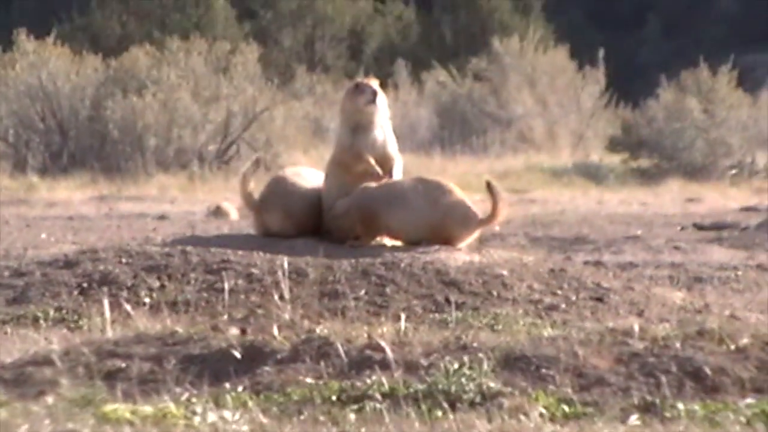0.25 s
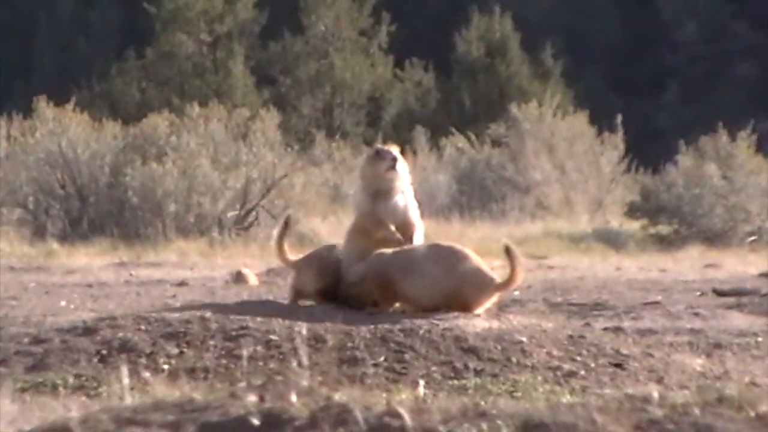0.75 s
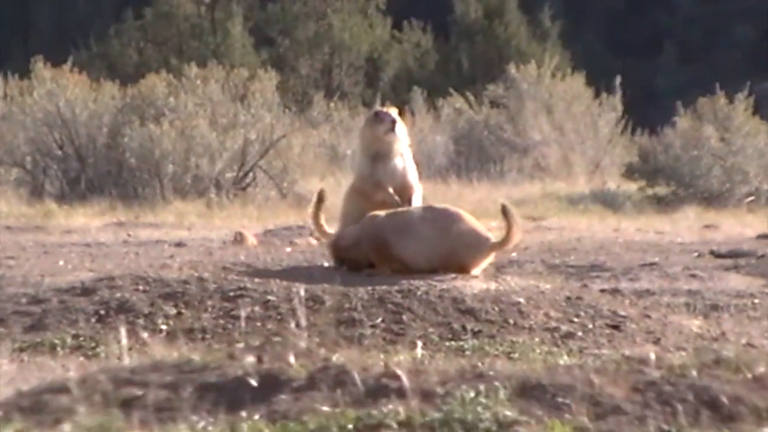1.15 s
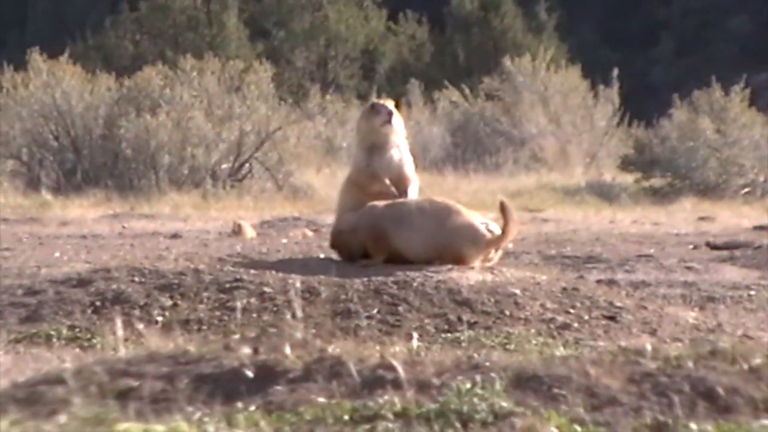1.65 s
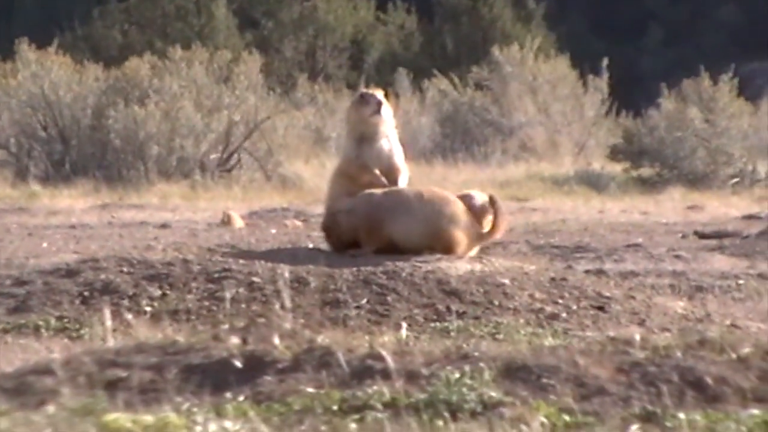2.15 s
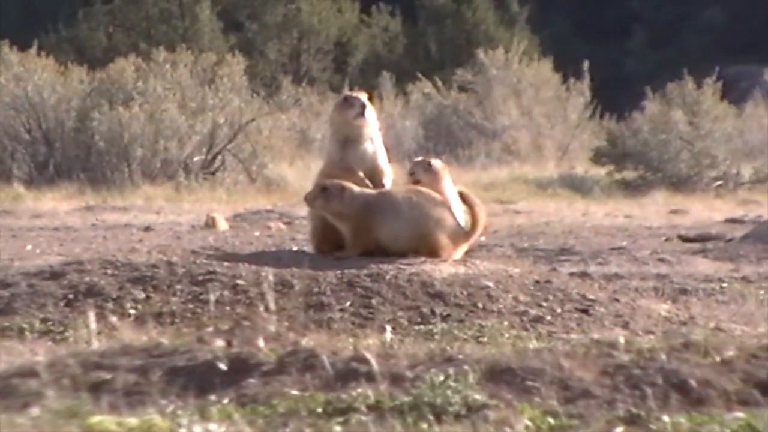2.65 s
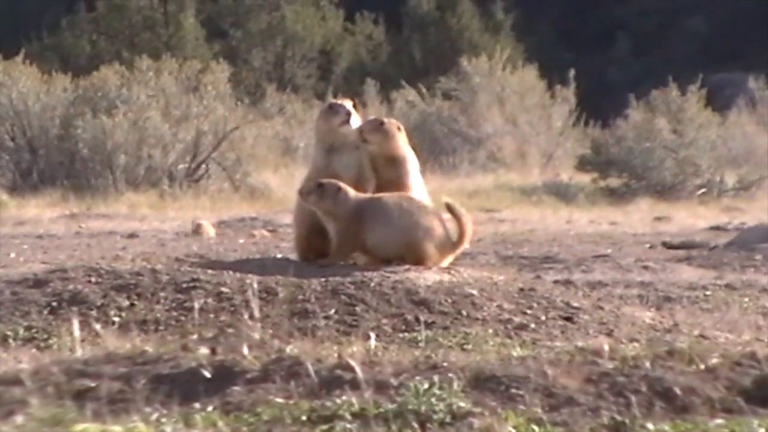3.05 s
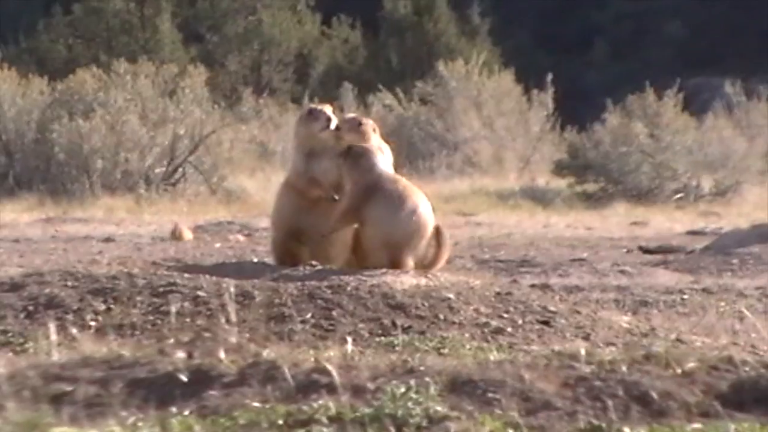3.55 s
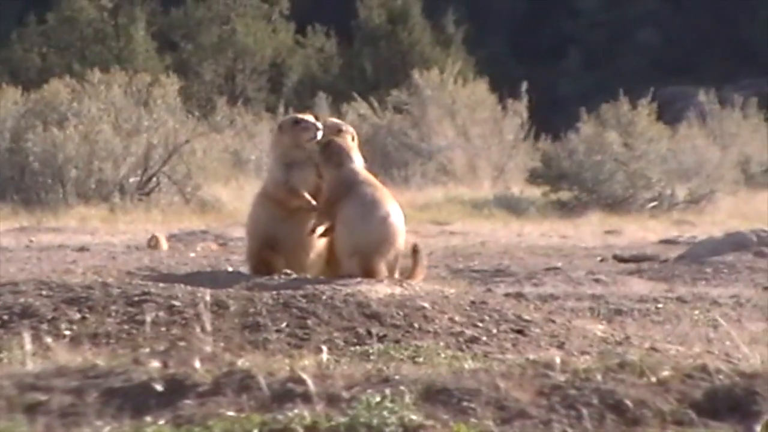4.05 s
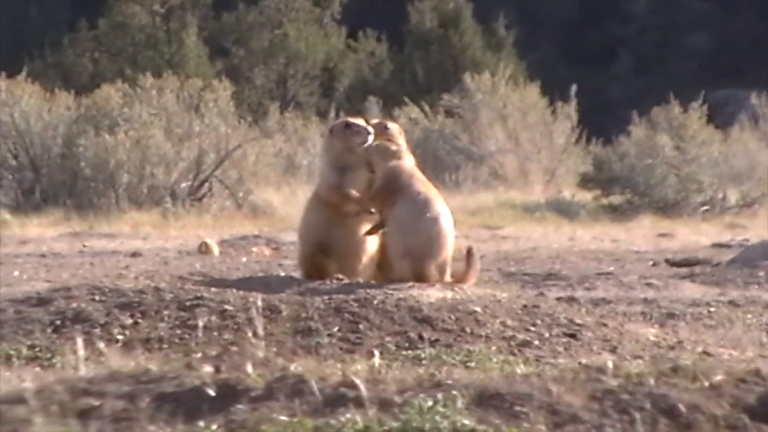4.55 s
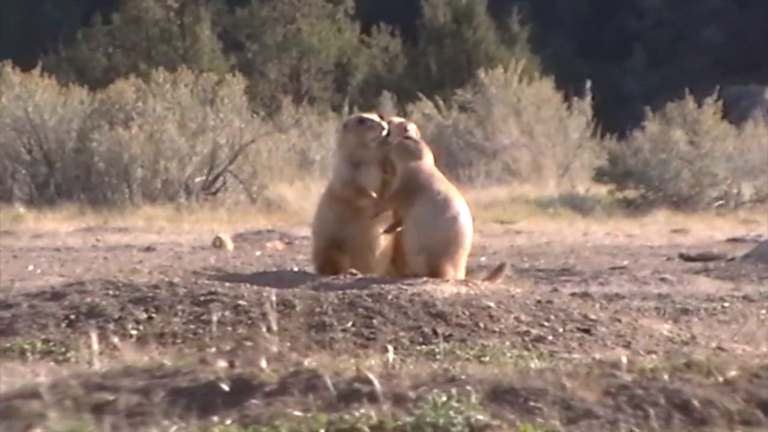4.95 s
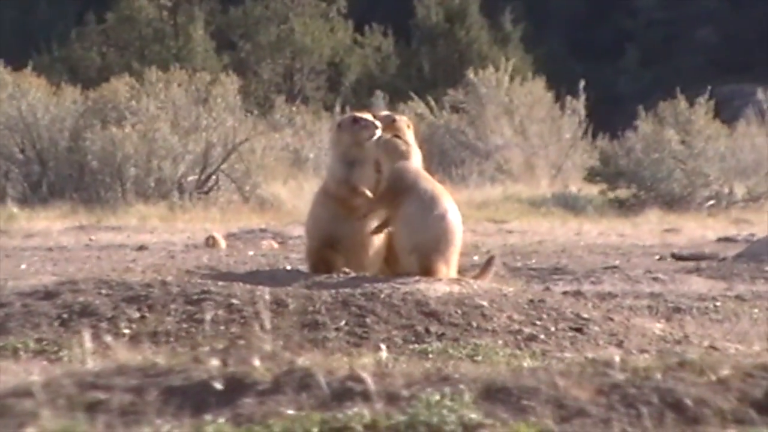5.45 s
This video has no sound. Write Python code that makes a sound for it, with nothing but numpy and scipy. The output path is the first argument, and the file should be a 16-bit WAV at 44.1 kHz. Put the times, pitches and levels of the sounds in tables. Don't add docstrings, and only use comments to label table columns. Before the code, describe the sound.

Distant rodent barks, high and clipped like whistled yelps, repeat about four per second over a soft far traffic rush and low wind puffs. A dull handling thud comes under one second. Near three seconds a short two-toned whine leads to another, quieter caller, interrupted by a bright plastic crack with a short rattle. Small skin scrapes touch the hand-held stereo microphone; slight open-air echoes trail the calls.

```python
import sys
import numpy as np
from scipy import signal
from scipy.io import wavfile

SR = 44100
rng = np.random.default_rng(int(sys.argv[2]) if len(sys.argv) > 2 else 0)


def undo_db(level):
    steps = np.asarray(level, float) / 20
    return 10 ** steps


def transcribe(u):
    v = np.clip(np.atleast_2d(u).T, -1, 1)
    q = np.round(v * 32767).astype(np.int16)
    wavfile.write(sys.argv[1], SR, q)


N = 250929

# (f/Hz, level/dB per Hz)
AIR_MID = [(15, -42), (25, -17), (166, -10.5), (263, -7), (463, -4), (503, -11.5), (624, -3), (754, -3.5),
           (988, -1), (1400, -9), (1560, -9.5), (2050, -8.5), (2480, -11.5), (3920, -12), (16000, -26)]
AIR_SIDE = [(15, -53), (25, -20), (188, -6.5), (226, -9.5), (374, -1.5), (471, -7.5), (606, 1.5),
            (3620, -13), (3970, -37.5), (6000, -39), (7800, -62.5), (13200, -120)]
AIR_MID_DB, AIR_SIDE_DB = -61.5, -71
# (t/s, half width/s, lift/dB)
RUSH_SWELLS = [
    (.3, .3, 1),
    (1.55, .5, 3),
    (2.25, .25, 2),
    (4.1, .45, 4.5),
    (4.75, .15, 1.5),
    (5.5, 0.11, 2),
]
DRONE_SWELLS = [
    (.01, 0.11, 4),
    (1.45, 0.37, 2.5),
    (3.1, 0.78, 3),
]
# (t/s, half width/s,
# lift/dB)
GUSTS = [(.37, 0.028, 10), (.51, 0.026, 14.5), (.6, 0.045, 20.5), (.78, 0.038, 20.5), (.93, .08, 8.5),
         (2.03, .05, 13.5), (2.11, 0.036, 19), (2.53, 0.039, 13.5), (2.82, .06, 11), (3.18, 0.077, 5),
         (3.6, 0.023, 11.5), (3.95, .15, 7), (4.17, 0.056, 12.5), (4.35, .04, 6), (5.15, .1, 2),
         (5.5, .04, 7), (5.68, .08, 4.5)]
# (f/Hz, half width/Hz, level/dB)
CASE_HUM = (2015, 50, -84)
WHINE_HZ, WHINE_DB = 15734, -87

# (t/s, length/s, top f/Hz, crest place/0-1, level/dB)
FIRST_BARKS = [(0.095, 0.057, 1773, 0.36, -50.5), (0.331, 0.052, 1800, 0.31, -50),
               (0.579, 0.046, 1455, 0.56, -54), (0.79, 0.045, 1444, 0.6, -58),
               (1.009, 0.05, 1750, 0.25, -54), (1.254, 0.048, 1455, 0.32, -52),
               (1.485, 0.047, 1488, 0.56, -53.5), (1.716, 0.054, 1498, 0.53, -53.5),
               (1.914, 0.059, 1603, 0.27, -55), (2.14, 0.046, 1693, 0.28, -57),
               (2.433, 0.049, 1503, 0.39, -54.5), (2.679, 0.05, 1535, 0.41, -53.5),
               (2.965, 0.049, 1360, 0.4, -57.5)]
SECOND_BARKS = [
    (3.342, 0.052, 1775, 0.19, -59),
    (3.93, 0.047, 1948, 0.4, -60),
    (4.286, 0.048, 1932, 0.24, -61),
    (4.524, 0.052, 1888, 0.3, -61.5),
    (4.808, 0.05, 1820, 0.35, -57),
    (5.065, 0.05, 1680, 0.47, -58.5),
    (5.323, 0.049, 1544, 0.48, -55.5),
    (5.544, 0.061, 1510, 0.46, -68.5),
]
# (relaxed level/dB, strained level/dB,
# gain as the mouth closes: relaxed/dB, strained/dB)
FIRST_VOICE = [(-10, 1, -3, -10), (-2.5, 0.3, 1, 1), (-18, -16, -12, 6), (-32.5, -25, 20, -4.5),
               (-34, -26.5, 6, -4), (-30, -31, -14, -7)]
SECOND_VOICE = [(0, 11, 3, -1), (-0.3, 2.9, -9, 0.1), (-28, -13, 3, -3), (-42.5, -24, 1, 2),
                (-34.5, -32, -9, -11), (-40, -41, 2.5, 3)]
# (top f/Hz, rise/share of pitch, even share of the fall/0-1,
# half-line level/dB, echo level/dB)
FIRST_STRAIN = [
    (1444, 0.207, 0.05, -42, -19),
    (1750, 0.203, 1, -14, -31),
]
SECOND_STRAIN = [
    (1526, 0.17, .2, -40, -26),
    (1864, 0.13, 0.4, -9, -19),
]
FIRST_SAG_PER_S, SECOND_SAG_PER_S = 6.85, 8.1
BEND_PER_CREST = 7.0
# (f/Hz, level/dB)
THROAT = [(1200, -27.5), (2300, -17.5), (2700, -11.5), (3100, -4), (3500, 0), (3900, 0.5), (4400, -7.5),
          (5000, 7.5), (5600, -2.3), (6200, 21.5), (6800, 18.5), (7500, 17), (8400, 3), (10000, -4)]
# (place/0-1, level/dB)
EFFORT = [(0.0, 3), (0.06, -1), (0.15, 3), (0.35, 4), (0.6, 3), (0.85, 2), (0.94, -3), (1.0, 5)]
LEG_LOSS_DB = 17.5
BOUNCE = {5: (.3, 2380), 13: (.3, 3400), 14: (.6, 782), 15: (.5, 770), 16: (.6, 3620)}
# (t/s, gain per overtone above the second/dB, level thrown at the bank/dB)
FACING = [(.1, -0.6, -25.5), (.36, 1.35, -25), (.6, -0.3, -32), (.82, 0.5, -23), (1.15, -1, -25),
          (1.5, -0.9, -14), (1.74, -1.2, -15), (1.94, 1.2, -17), (2.16, 3, -26), (2.45, -2, -28),
          (2.98, -1.5, -28), (3.37, -2.5, -16), (3.95, 0, -18), (4.55, -0.5, -17), (4.83, 0.3, -23),
          (5.1, -1.7, -26), (5.33, -2, -20), (5.54, 1.5, -1.5)]
BANK_S = .064
# (delay/s, level/dB)
SCRUB = [(.056, -3), (.068, -3), (.083, -3), (.098, -3), (.12, -6), (.15, -6), (.19, -10)]

# (t/s, level/dB)
KNOCK = [
    (.7757, -32),
    (.7775, -27),
    (.7805, -42),
    (.88, -52),
]
# (f/Hz, level/dB, t60/s)
KNOCK_MODES = [(192, -11, 0.02), (260, -2.5, 0.012), (388, -6, 0.044), (555, -5.5, 0.019), (705, -4, 0.018),
               (805, -12, 0.012), (1240, -5.5, 0.011), (1690, -8, 0.012), (1940, -37, 0.062),
               (3000, -30, .006), (4020, -8, 0.0058), (5770, -5, 0.0061)]
# (t/s, length/s, level/dB)
RUB = [
    (2.129, 0.0082, -58),
    (4.737, 0.044, -56),
    (4.783, 0.044, -54),
]
# (f/Hz, level/dB)
RUB_COLOUR = [(750, -4), (1400, 8), (2300, 1), (3300, 2.5), (4500, 3), (6000, -7.5), (8000, -42)]

# (t/s, first voice f/Hz, first level/dB, second voice f/Hz, second level/dB)
WAIL = [
    (2.842, 1720, -65, 2910, -90),
    (2.857, 2150, -65, 2950, -88),
    (2.875, 2240, -68, 3000, -78),
    (2.89, 2165, -63.5, 3110, -66.5),
    (2.925, 2150, -56, 2990, -66),
    (2.967, 2130, -57.5, 3000, -67),
    (2.98, 1950, -68, 2930, -83),
    (2.997, 1490, -63, 2820, -90),
]
# (multiple of first voice, multiple of second voice, level/dB)
WAIL_LINES = [(1, 0, -7), (2, 0, 3.5), (3, 0, -16), (0, 1, 5), (3, -1, -1), (1, 1, -10)]

# (t/s, level/dB)
SNAP = [
    (3.5982, -5),
    (3.5986, -10),
    (3.5990, -9),
    (3.5995, -4),
    (3.6002, -10),
    (3.6013, -16),
]
# (f/Hz, level/dB, t60/s)
SNAP_MODES = [(636, -26, .035), (1190, -13.5, 0.035), (2011, -15.5, 0.027), (2760, -9, 0.008),
              (3580, 1.5, 0.0042), (4700, -11, 0.0072), (6140, 2, 0.0021), (5560, -12, 0.0068),
              (7060, -4, .005), (8460, -26, 0.011), (9400, -38.5, .02), (10620, -6, .003),
              (13200, -17, 0.0032)]
SNAP_RING = [(716, -43, .19), (810, -23, .05), (1030, -28, .06), (1330, -30, .03), (1900, -34, .05),
             (2482, -35, .05), (3220, -38, .06), (3870, -34, .035), (3870, -54, .2), (5730, -31, .04),
             (6800, -49, .1)]
# (level/dB, t60/s, low f/Hz, high f/Hz)
SNAP_TAIL = (-33, .03, 600, 8000)


def rms_one(x):
    return x / np.sqrt(np.mean(x ** 2) + 1e-20)


def at_hz(points, hz):
    f, level_db = np.array(points).T
    return np.interp(np.log(hz), np.log(f), level_db)


def band(x, low_hz, high_hz):
    return signal.sosfilt(signal.butter(2, [low_hz, high_hz], "band", fs=SR, output="sos"), x)


def drift(rate):
    r = np.exp(-80 * np.pi * rate / SR)
    slow = signal.lfilter([1], [1, -2 * r, r * r], rng.standard_normal(N // 40 + 2002))[2000:]
    return np.interp(np.arange(N) / 40, np.arange(len(slow)), rms_one(slow))


def swells(rows):
    t = np.arange(N) / SR
    return sum(db * np.exp(-((t - s) / half) ** 2) for s, half, db in rows)


def air():
    lifts = [(swells(RUSH_SWELLS), 1050, .6), (swells(DRONE_SWELLS), 280, .8), (swells(GUSTS), 45, 1.1)]
    edges = 22 * 2 ** (np.arange(30) / 3)
    white = rng.standard_normal((2, 2, N))
    out = np.zeros((2, N))
    for k, (low, high) in enumerate(zip(edges, edges[1:])):
        hz = np.sqrt(low * high)
        lift_db = sum((db - db.mean()) * np.exp(-(np.log(hz / centre_hz) / wide) ** 2)
                      for db, centre_hz, wide in lifts)
        wander_db = 1.5 * min(1, 2500 / hz) * drift(3.9)
        colour = undo_db([[at_hz(AIR_MID, hz)], [at_hz(AIR_SIDE, hz)]])
        out += colour * undo_db(lift_db + wander_db) * band(white[k % 2], low, high)
    return out / out.std(axis=1, keepdims=True) * undo_db([[AIR_MID_DB], [AIR_SIDE_DB]])


def electronic_whine():
    return undo_db(WHINE_DB) * np.sin(2 * np.pi * WHINE_HZ * np.arange(N) / SR)


def case_hum():
    hz, width_hz, db = CASE_HUM
    return undo_db(db) * rms_one(band(rng.standard_normal(N), hz - width_hz, hz + width_hz))


def calls():
    callers = [(FIRST_BARKS, FIRST_VOICE, FIRST_STRAIN, FIRST_SAG_PER_S),
               (SECOND_BARKS, SECOND_VOICE, SECOND_STRAIN, SECOND_SAG_PER_S)]
    for rows, voice, (relaxed, strained), sag in callers:
        easy_db, hard_db, easy_close, hard_close = np.transpose(voice)
        for row in rows:
            strain = np.clip((row[2] - relaxed[0]) / (strained[0] - relaxed[0]), 0, 1)
            tilt_db = np.interp(row[0], *np.transpose(FACING)[:2])
            turn_db = tilt_db * np.maximum(np.arange(6) - 1, 0)
            voice_db = row[4] + turn_db + easy_db + strain * (hard_db - easy_db)
            close_db = easy_close + strain * (hard_close - easy_close)
            delivery = np.add(relaxed, strain * np.subtract(strained, relaxed))[1:]
            yield row, voice_db, close_db, [sag, *delivery]


def barks():
    direct, sent = np.zeros(N + SR), np.zeros(N)
    flutter = [drift(70) for k in range(3)]
    for n, (row, voice_db, mouth_db, delivery) in enumerate(calls()):
        s, length, top_hz, crest, level_db = row
        sag, rise, droop, half_db, echo_db = delivery
        span = np.arange(round(s * SR), round((s + length) * SR))
        u = np.linspace(0, 1, len(span))
        early = abs(crest - u) / crest
        late = abs(u - crest) / (1 - crest)
        climb = 1 - rise * early ** max(1.4, BEND_PER_CREST * crest)
        slide = droop * (np.sqrt(late ** 2 + .01) - .1) * 1.1 + (1 - droop) * late ** 4
        fall = sag * (1 - crest) * length
        hz = top_hz * np.where(u < crest, climb, 1 - fall * slide)
        phase = 2 * np.pi * np.cumsum(hz) / SR
        effort = undo_db(np.interp(u, *np.transpose(EFFORT)) - LEG_LOSS_DB * (1 - hz / top_hz))
        effort = effort * np.minimum(1, np.minimum(u, 1 - u) / 0.026)
        bounce, notch_hz = BOUNCE.get(n, (0, top_hz))
        tones, call = [], 0
        for k, (db, close_db) in enumerate(zip(voice_db, mouth_db), 1):
            tone_db = db + 5.5 + close_db * (u - .5) + at_hz(THROAT, k * hz) + 3.18 * flutter[k % 3][span]
            tones.append(undo_db(tone_db) * np.sin(k * phase))
            ground = rms_one(abs(1 - bounce * np.exp(2j * np.pi * k * hz / notch_hz)))
            call = call + tones[-1] * ground
        half_lines = sum(np.sin((k + .5) * phase) for k in range(2, 5))
        call += undo_db(level_db + half_db) * u * half_lines
        direct[span] += call * effort
        second = tones[1] * effort
        bank_db = np.interp(s, *np.transpose(FACING)[::2])
        direct[span + round(BANK_S * SR)] += second * undo_db(bank_db + 1.5) * np.sin(np.pi * u ** 0.77) ** 2
        sent[span] += second * undo_db(echo_db) * np.sin(np.pi * u ** 0.4)
    return direct[:N], sent


def scrub(sent):
    response = np.zeros(SR // 4)
    twigs = rng.standard_normal((len(SCRUB), 1800))
    for (delay, db), smear in zip(SCRUB, twigs):
        at = round(delay * SR)
        response[at:at + 1800] += undo_db(db - 21) * smear * np.exp(-np.arange(1800) / 600)
    return band(signal.fftconvolve(sent, response)[:N], 2600, 6800)


def ring(clicks, hz, t60):
    r, w = undo_db(-60 / (t60 * SR)), 2 * np.pi * hz / SR
    return signal.lfilter([1, -1], [1, -2 * r * np.cos(w), r * r], clicks + 1e-18) * np.cos(w / 2)


def struck(contacts, modes, spread_db, low_hz, soft_hz):
    first, length = round(contacts[0][0] * SR), SR // 2
    at = [round(s * SR) - first for s, db in contacts]
    contact_db = np.array(contacts)[:, 1]
    body = np.zeros((2, length))
    for k, (hz, level_db, t60) in enumerate(modes):
        chance, clicks = rng.standard_normal((2, len(at))), np.zeros((2, length))
        clicks[0, at] = undo_db(contact_db + level_db + spread_db * chance[0])
        uneven = (-1) ** (k + 1) * min(.4, .08 + (600 / hz) ** 2)
        clicks[1, at] = clicks[0, at] * uneven * undo_db(2 * chance[1])
        body += ring(clicks, hz, t60)
    body = signal.sosfilt(signal.butter(3, low_hz, "high", fs=SR, output="sos"), body)
    body = signal.sosfilt(signal.butter(2, soft_hz, fs=SR, output="sos"), body)
    return np.pad(body, [(0, 0), (first, N - first - length)])


def case_knock():
    return struck(KNOCK, KNOCK_MODES, 0.37, low_hz=160, soft_hz=3140) * undo_db(-5.0)


def rubbing():
    t, press = np.arange(N) / SR, np.zeros(N)
    for s, length, db in RUB:
        u = np.clip((t - s) / length, 0, 1)
        press += undo_db(db) * np.sin(np.pi * np.sqrt(u))
    grains = rng.standard_normal((2, N)) * (rng.random((2, N)) < .08)
    case = sum(undo_db(db) * rms_one(ring(grains[k % 2], hz, 5.7 / hz)) for k, (hz, db) in enumerate(RUB_COLOUR))
    return press * rms_one(band(case, 600, 5600))


def wail():
    s, *columns = np.transpose(WAIL)
    span = np.arange(round(s[0] * SR), round(s[-1] * SR))
    first_hz, first_db, second_hz, second_db = [np.interp(span / SR, s, c) for c in columns]
    first = 2 * np.pi * np.cumsum(first_hz * (1 + 0.008 * drift(150)[span])) / SR
    second = 2 * np.pi * np.cumsum(second_hz * (1 + 0.015 * drift(150)[span])) / SR
    out = np.zeros(N)
    for m, n, db in WAIL_LINES:
        voice_db, rough_db = (second_db, 4.5) if n else (first_db, 2.5)
        level_db = db + voice_db + rough_db * drift(130)[span]
        out[span] += undo_db(level_db) * np.sin(m * first + n * second)
    return out


def case_snap():
    snap = struck(SNAP, SNAP_MODES + SNAP_RING, 3.7, low_hz=487, soft_hz=7900) * undo_db(-1.5)
    overloaded = 1.1 * np.tanh(snap / 1.1)
    return signal.sosfilt(signal.butter(5, [300, 15000], "band", fs=SR, output="sos"), overloaded)


def rattle():
    db, t60, low_hz, high_hz = SNAP_TAIL
    age = np.arange(N) / SR - SNAP[-1][0]
    buzz = band(band(rng.standard_normal(N), low_hz, high_hz), low_hz, high_hz)
    return (age > 0) * undo_db(db - 60 * np.abs(age) / t60) * rms_one(buzz)


def scene():
    mid, side = air() + case_knock() + case_snap()
    direct, sent = barks()
    long_call = wail()
    echoes = scrub(sent + undo_db(-27) * long_call)
    mid = mid + electronic_whine() + case_hum() + direct + echoes + rubbing() + long_call + rattle()
    return np.array([mid + side, mid - side])


def band_limit(x):
    return signal.sosfilt(signal.butter(12, 16490, fs=SR, output="sos"), x)


def record(dry):
    rounded = 1.05 * np.tanh(dry / 1.05)
    cut = signal.sosfilt(signal.ellip(10, .5, 60, 15900, fs=SR, output="sos"), rounded)
    return band_limit(cut)


dry = scene()
out = record(dry)
transcribe(out)
```